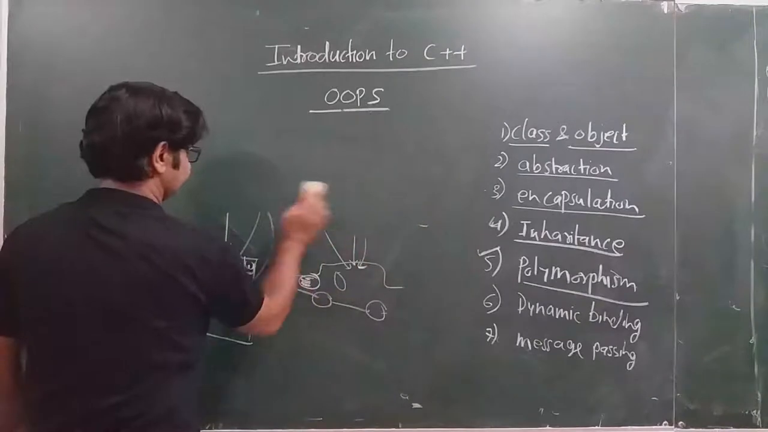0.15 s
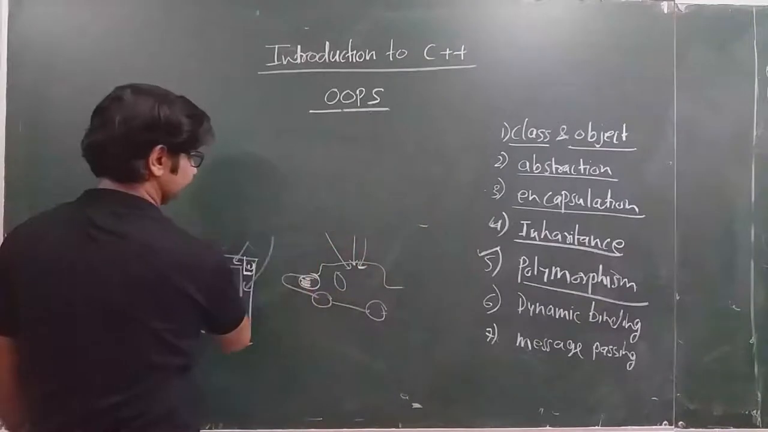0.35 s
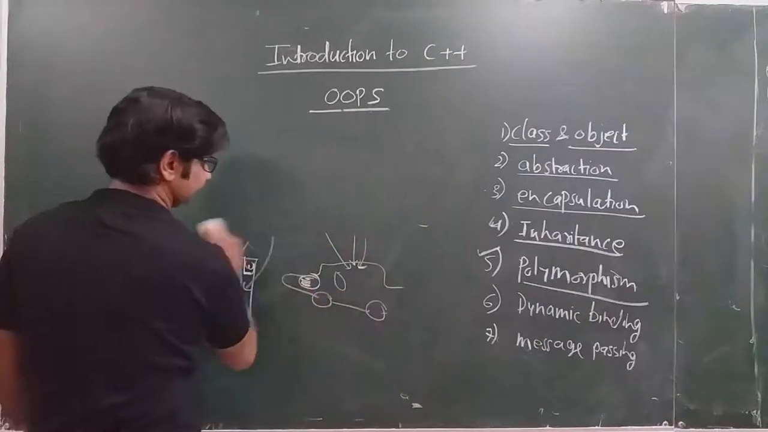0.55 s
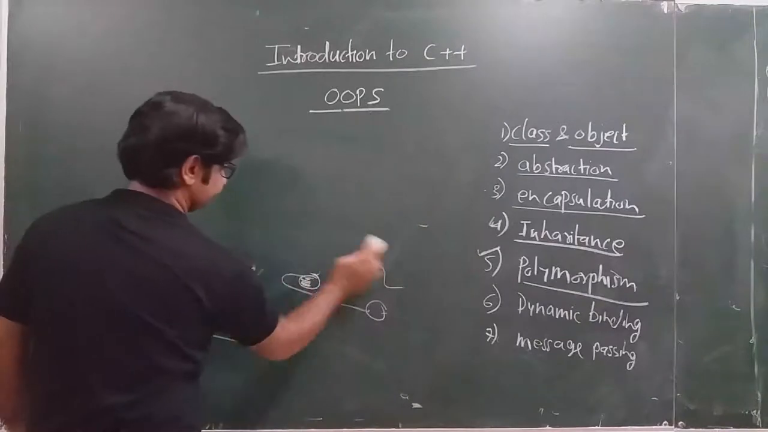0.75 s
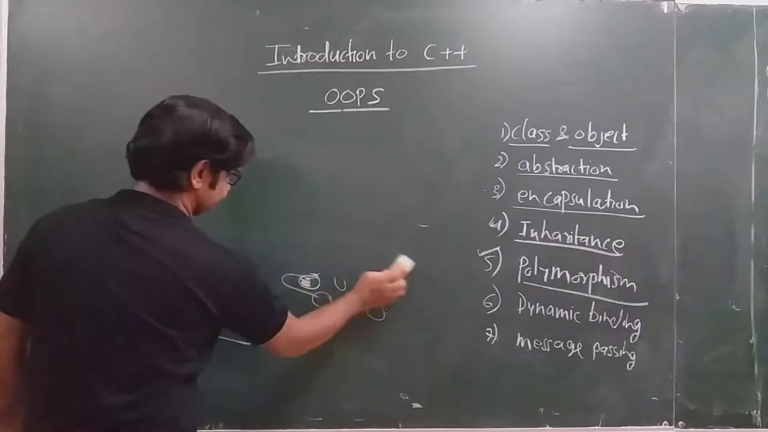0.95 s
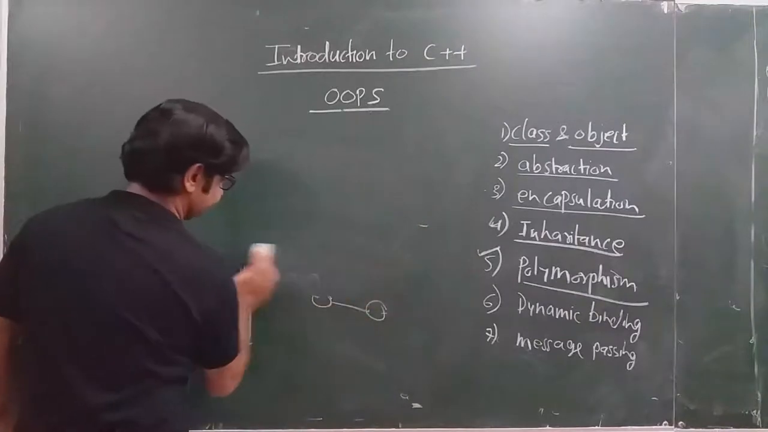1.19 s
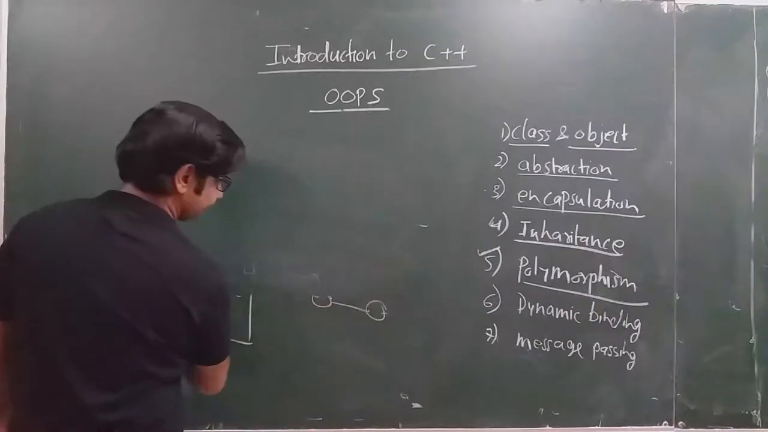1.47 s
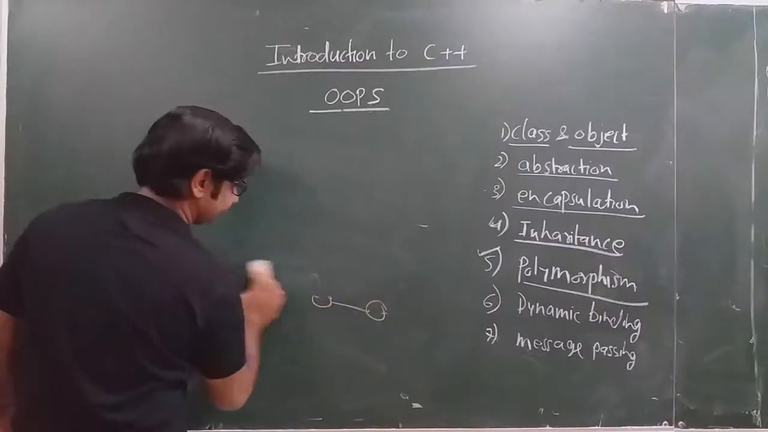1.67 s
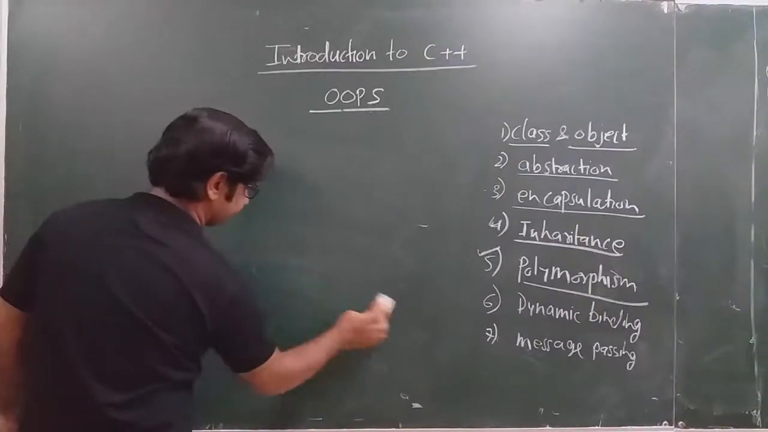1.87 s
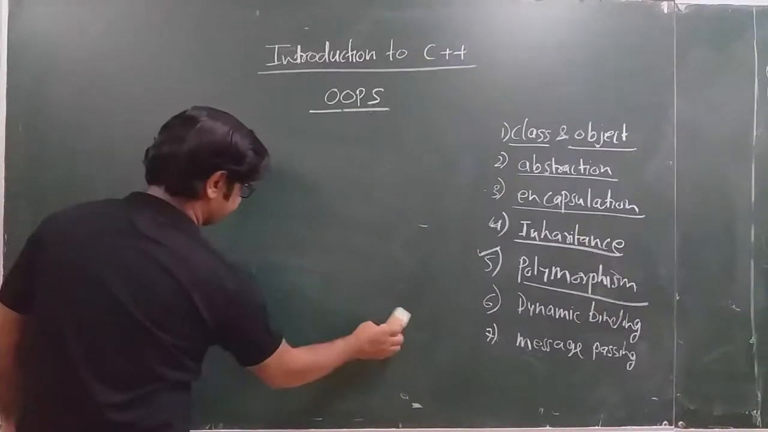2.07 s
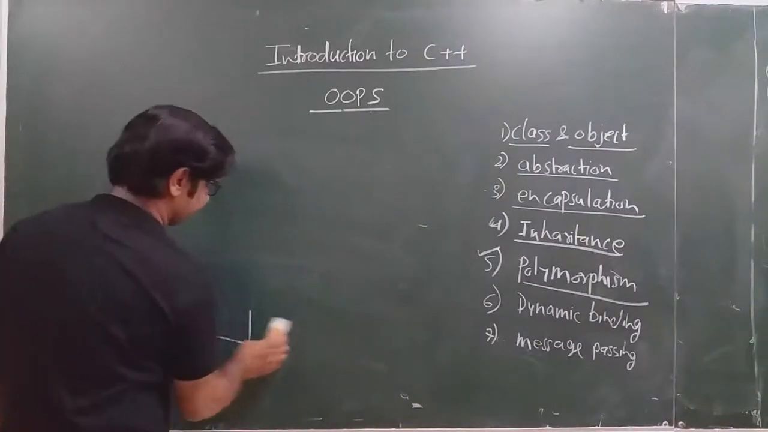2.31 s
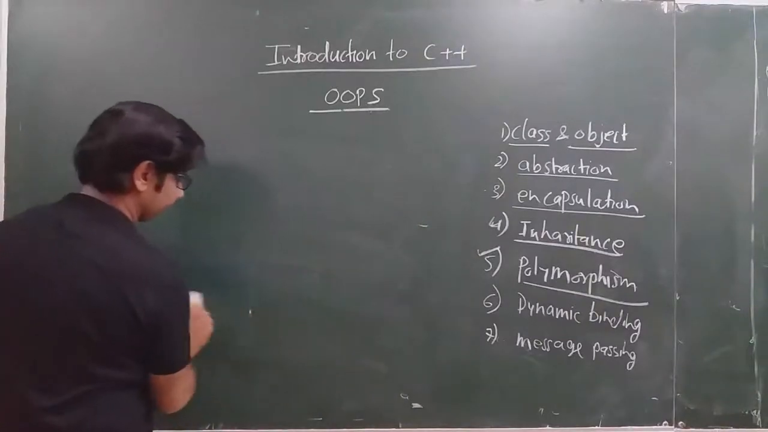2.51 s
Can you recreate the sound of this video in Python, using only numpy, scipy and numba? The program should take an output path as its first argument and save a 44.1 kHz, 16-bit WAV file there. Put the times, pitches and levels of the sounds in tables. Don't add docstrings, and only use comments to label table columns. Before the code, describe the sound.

A felt eraser sweeps a chalkboard in five dry, gritty strokes, with brief dips between them, rising and falling in pitch as the hand moves; steady fan hum behind, bare classroom, microphone about two metres away.

```python
import sys
import numpy as np
from scipy import signal
from scipy.fft import rfft, irfft, next_fast_len
from scipy.io import wavfile
from scipy.ndimage import uniform_filter1d
from numba import njit

SR = 44100
rng = np.random.default_rng(int(sys.argv[2]) if len(sys.argv) > 2 else 0)


def level_to_linear(level):
    exponent = np.asarray(level, float) / 20
    return 10 ** exponent


def dump_mix(stems):
    frames = np.atleast_2d(stems).T
    limited = np.clip(frames, -1, 1)
    pcm = np.round(limited * 32767).astype(np.int16)
    wavfile.write(sys.argv[1], SR, pcm)


N = 116865


def level(x, db):
    return x * level_to_linear(db) / np.sqrt(np.mean(x ** 2))


@njit
def svf(x, hz, width):
    y, band, low = np.empty(len(x)), 0., 0.
    for i in range(len(x)):
        g, k = np.tan(np.pi * hz[i] / SR), width[i] / hz[i]
        v = (band + g * (x[i] - low)) / (1 + g * (g + k))
        band = 2 * v - band
        low += 2 * g * v
        y[i] = k * v
    return y


def ring(x, hz, width_hz):
    hz = np.clip(hz * np.ones(N), 20, .45 * SR)
    width_hz = width_hz * np.ones(N)
    return level(svf(svf(x, hz, width_hz), hz, width_hz), 0)


def walk(rate):
    values = rng.standard_normal(size=400)
    hold = int(SR / rate)
    held = values[np.arange(N) // hold % 400]
    w = uniform_filter1d(uniform_filter1d(held, hold), hold)
    return (w - w.mean()) / w.std()


def air():
    # frequency in Hz, density in dB per Hz.
    spectrum = [(20, -33), (60, -13), (130, -3), (521, -10.5), (1380, -17), (2000, -24.5), (6000, -37.5),
                (15500, -49)]
    size = next_fast_len(N)
    f = np.arange(size // 2 + 1) * SR / size + 1
    hz, db = np.array(spectrum).T
    gain = level_to_linear(np.interp(np.log(f), np.log(hz), db))
    rush = irfft(rfft(rng.standard_normal(size)) * gain, size)[:N]
    return level(rush, -38)


def fan(t):
    # multiple of the motor's pitch, rms level in dB,
    # time in seconds when it sinks away (9: steady throughout).
    harmonics = [(1, -46, 9), (2, -48, 9), (4, -41.5, 9), (6, -51, 9), (8, -56.5, 9), (9, -53, 9),
                 (10, -46, 1.58), (11, -61, 9), (12, -56, 9), (15, -65, 9), (20, -67, 9), (21, -67, 9),
                 (22, -62, 9), (29, -63.5, 9)]
    # frequency in Hz, rms level in dB.
    machines = [(37.3, -73), (45.75, -66), (51.75, -68), (92.36, -52), (149.1, -52), (189.15, -53.5),
                (200.28, -49), (554.8, -53), (777.3, -64)]
    # centre in Hz, width in Hz, rms level in dB.
    casing = [(146.6, 23, -46.5), (200.7, 35.4, -44.5), (241.2, 51, -47.5), (288.2, 16.5, -48),
              (337, 20, -58.5), (436.3, 20, -50), (678, 107, -52), (828, 60, -55.5)]
    motor_hz, wobble_per_s, wobble_db = 48.81, 5.6, 0.3
    swells_s, fade_s, fade_db = .27, 0.042, -12

    def tone(hz, db):
        return level(np.sin(2 * np.pi * (hz * t + rng.random())), db)

    out = 0
    for multiple, db, fades in harmonics:
        sway_db = 0
        if fades < t[-1]:
            outside_s = np.maximum(t - fades, swells_s - t)
            sway_db = fade_db * np.clip(outside_s / fade_s, 0, 1)
        if multiple > 1:
            sway_db = sway_db + wobble_db * walk(wobble_per_s)
        out = out + tone(multiple * motor_hz, db) * level_to_linear(sway_db)
    for hz, db in machines:
        out = out + tone(hz, db)
    for hz, width_hz, db in casing:
        out = out + level_to_linear(db) * ring(rng.standard_normal(N), hz, width_hz)
    return out


def side_patches():
    # centre in seconds, low edge in Hz, high edge in Hz, rms level in dB.
    patches = [
        (.261, 6900, 8250, -61),
        (.354, 6200, 8250, -55),
        (.354, 11700, 13800, -62),
        (.726, 6900, 9000, -57),
        (.726, 11000, 12400, -55),
        (1.237, 8250, 9650, -56),
        (1.608, 6900, 8250, -60.5),
    ]
    length_s = .037
    t, f = np.arange(N) / SR, np.arange(N // 2 + 1) * SR / N
    side = 0
    for at, low_hz, high_hz, db in patches:
        band = irfft(rfft(rng.standard_normal(N)) * (f > low_hz) * (f < high_hz), N)
        side = side + level(band, db) * np.exp(-((t - at) / (length_s / 2)) ** 4)
    return side * np.array([[1], [-1]])


@njit
def walls(x, lags, gain, damp):
    line, soft, out = np.zeros((8, 4096)), np.zeros(8), np.zeros(len(x))
    for i in range(len(x)):
        total = 0.
        for k in range(8):
            soft[k] += (1 - damp) * (gain[k] * line[k, (i - lags[k]) & 4095] - soft[k])
            total += soft[k]
        out[i] = soft[0] - soft[3] + soft[5] - soft[6]
        for k in range(8):
            line[k, i & 4095] = x[i] + soft[k] - total / 4
    return out


def body(x, t):
    # delay in ms, drift of the delay in ms, level in dB.
    echoes = [(3.1, .25, -11), (5.3, .4, -11), (8.9, .5, -12)]
    total, power = x, 1
    for delay_ms, drift_ms, db in echoes:
        delay_s = (delay_ms + drift_ms * walk(6)) / 1000
        total = total + level_to_linear(db) * np.interp(t - delay_s, t, x)
        power += level_to_linear(2 * db)
    return total / np.sqrt(power)


def scrape():
    grains_per_s, spread_db, grain_db = 9000, 2.5, -6
    chance = rng.random((2, N))
    hits = chance[0] < grains_per_s / SR
    sizes = level_to_linear(-spread_db * np.log(1 - chance[1]))
    grains = hits * sizes * np.sign(rng.standard_normal(N))
    return rng.standard_normal(N) + level(grains, grain_db)


def eraser(t):
    # time in seconds, rubbing level in dB from the hand's speed,
    # brightness in dB from its pressure.
    strokes = [
        [(0, -59, -10), (.06, -46.5, -9), (.12, -40, -3), (.17, -42.5, 0), (.3, -39, -8.5), (.39, -42, -9.5),
         (.43, -47, -15), (.46, -59, -14)],
        [(.49, -49, -8), (.55, -42, -7), (.61, -38, -6.5), (.72, -39.5, -5), (.83, -42.5, -7.5),
         (.89, -49, -11), (.935, -76, -5)],
        [(1.0, -48, -4), (1.06, -42.5, -2.5), (1.14, -41, -3.5), (1.24, -40, -8), (1.31, -40, -7.5),
         (1.38, -43.5, -11), (1.42, -50, -12), (1.46, -71, -6)],
        [(1.51, -50.5, -3.5), (1.57, -43.5, -6.5), (1.62, -41.5, -6.5), (1.7, -40.5, -7), (1.8, -38.5, -5),
         (1.88, -43, -7), (1.99, -51, -9), (2.032, -76, -14)],
        [(2.07, -55, -5), (2.14, -46.5, -7), (2.22, -41, -6), (2.3, -42, -6.5), (2.4, -41.5, -8.5),
         (2.52, -41, -9), (2.6, -49.5, -9), (2.655, -61, -8)],
    ]
    # time in seconds, resonance in Hz.
    hollow_path = [(0, 5400), (.13, 5170), (.3, 3780), (.44, 2480), (.55, 3000), (.65, 3730), (.83, 4750),
                   (.95, 5400), (1.07, 4750), (1.25, 3900), (1.42, 2470), (1.6, 3300), (1.77, 3900),
                   (1.95, 4900), (2.15, 5120), (2.33, 3580), (2.55, 2820), (2.65, 2450)]
    # time in seconds, hiss centre in Hz, hollow ring in dB,
    # top air in dB.
    felt = [
        (.17, 10000, -4.5, -1),
        (.68, 9660, -1, 1.5),
        (1.12, 9500, -2, 0),
        (1.7, 9500, -1.5, 1),
        (2.36, 10900, -1.5, 4.5),
    ]

    path_s, speed_db, pressure_db = np.concatenate([np.array(s) for s in strokes]).T
    rub = uniform_filter1d(np.interp(t, path_s, level_to_linear(speed_db)), size=500)
    bright_db = np.interp(t, path_s, pressure_db)
    felt_s, felt_hz, felt_ring_db, felt_air_db = np.array(felt).T
    hollow_hz = np.interp(t, *np.array(hollow_path).T) * (1 + 0.015 * walk(26))
    hiss_hz = np.interp(t, felt_s, felt_hz) * (1 + .02 * walk(15))
    ring_db = np.interp(t, felt_s, felt_ring_db)
    air_db = -4.5 + np.interp(t, felt_s, felt_air_db)
    patch_db = 1 * walk(14)

    def rough(x):
        flicker_db = -0.76 * walk(23)
        return x * level_to_linear(patch_db + flicker_db)

    rubbing = scrape()
    hollow = level_to_linear(ring_db) * rough(ring(rubbing, hollow_hz, .36 * hollow_hz))
    skirt = level_to_linear(-.5) * rough(ring(scrape(), 2990, 4660))
    grit = hollow + skirt

    hiss = rough(ring(rubbing, hiss_hz, 4300))
    hiss = hiss + level_to_linear(air_db) * rough(ring(scrape(), 12740, 12000))
    hiss = hiss + level_to_linear(-25) * rough(ring(rubbing, 7600, 2500))

    board = rough(ring(scrape(), 1840, 2200)) * level_to_linear(-46) * rub / level_to_linear(-39.5)
    return (level(grit, 0) + level(hiss, 0) * level_to_linear(bright_db)) * rub + board


def scene():
    t = np.arange(N) / SR
    wipe = body(eraser(t), t)
    room_t60_s, room_damp, room_db = 0.17, 0.35, -15
    lags = np.array([683, 811, 997, 1187, 1361, 1597, 1811, 2053])
    room = walls(wipe, lags, level_to_linear(-60 * lags / SR / room_t60_s), room_damp)
    return np.tile(wipe + level_to_linear(room_db) * room + fan(t) + air(), (2, 1))


def band_limit(x):
    return signal.sosfilt(signal.butter(12, 15670, fs=SR, output="sos"), x)


def record(dry):
    top_cut = signal.ellip(10, .2, 80, 15720, fs=SR, output="sos")
    mix = signal.sosfilt(top_cut, dry + side_patches())
    return band_limit(mix)


dry = scene()
out = record(dry)
dump_mix(out)
```